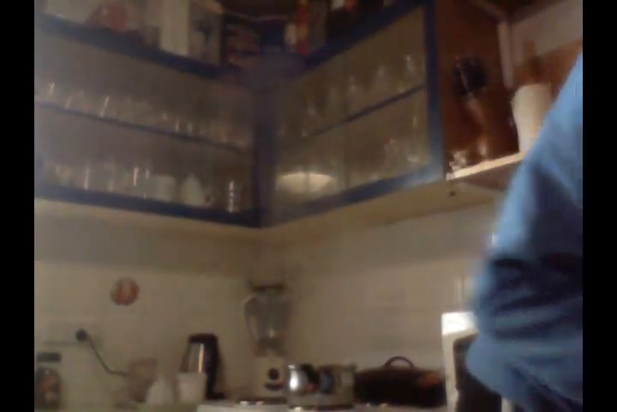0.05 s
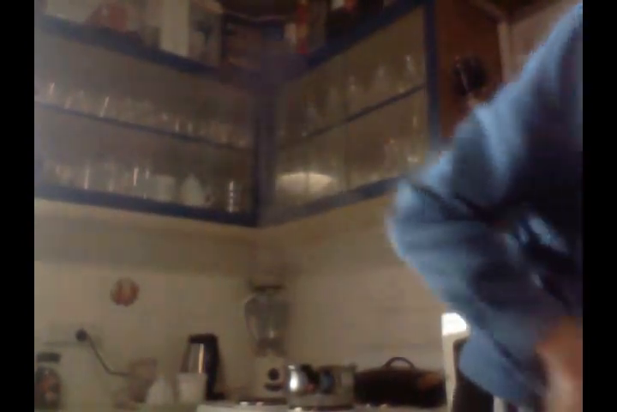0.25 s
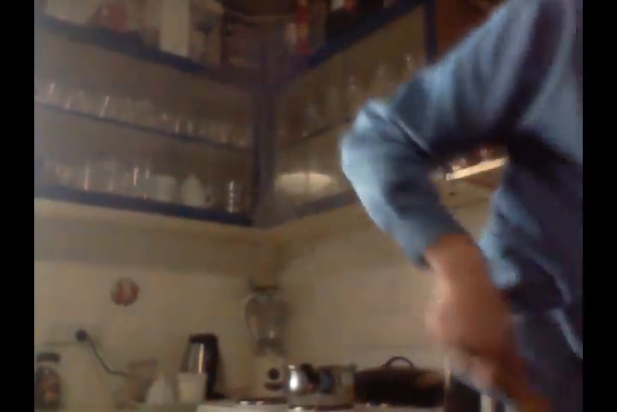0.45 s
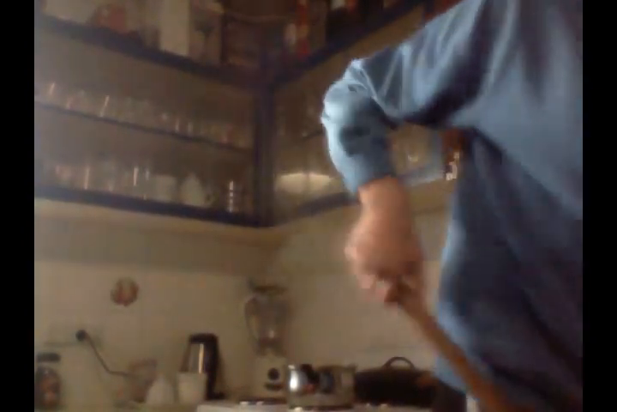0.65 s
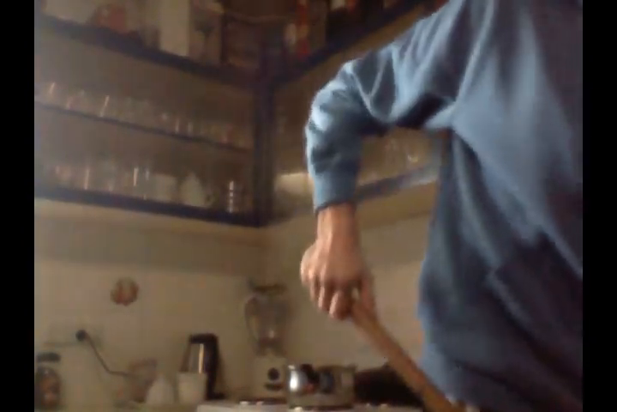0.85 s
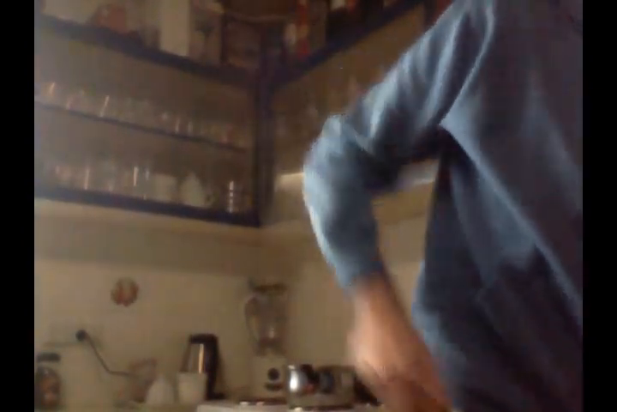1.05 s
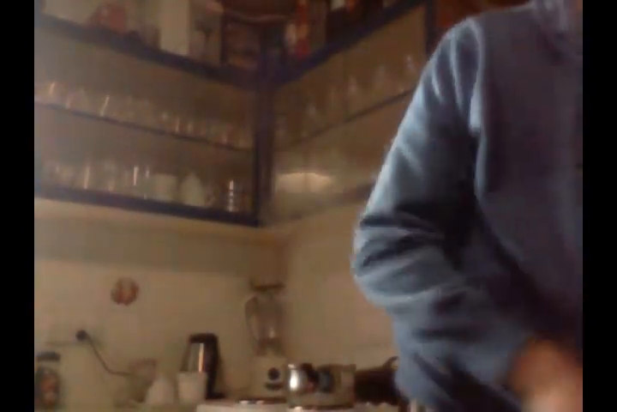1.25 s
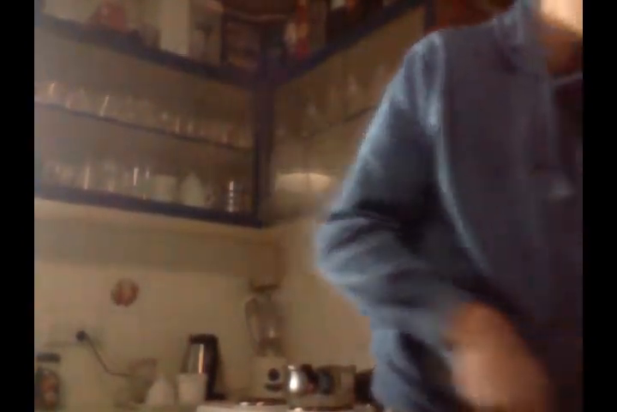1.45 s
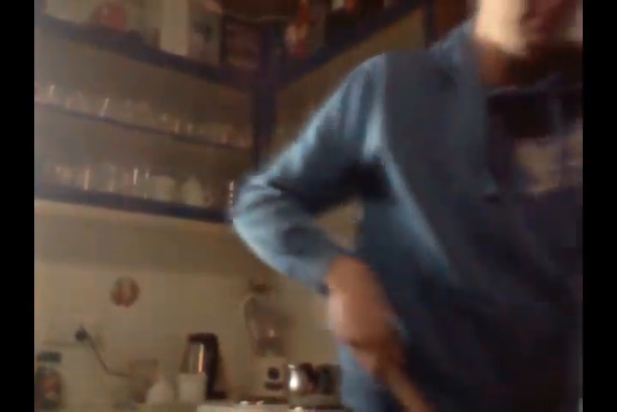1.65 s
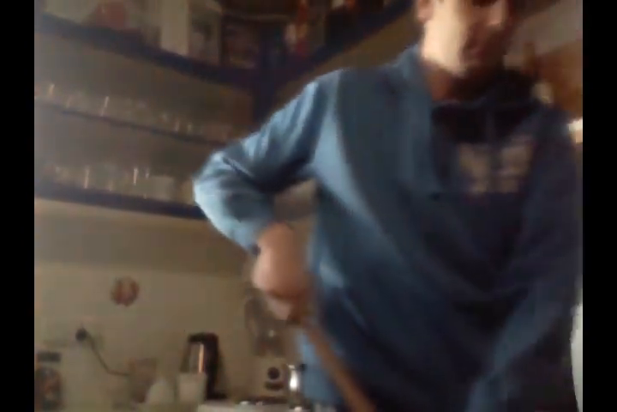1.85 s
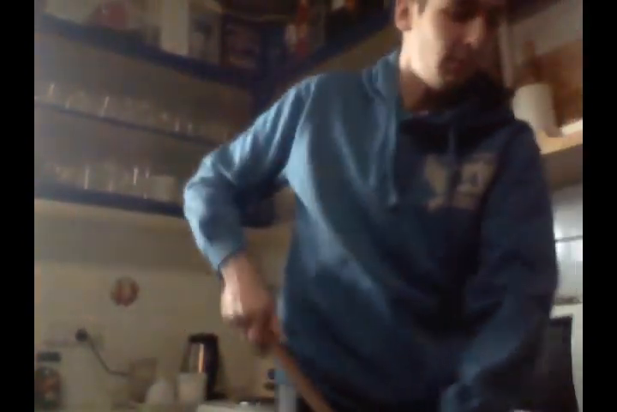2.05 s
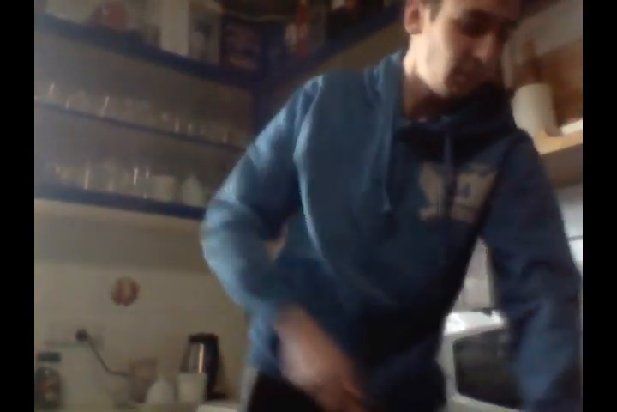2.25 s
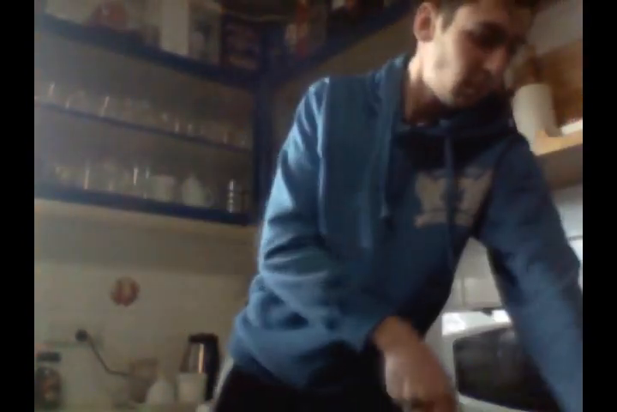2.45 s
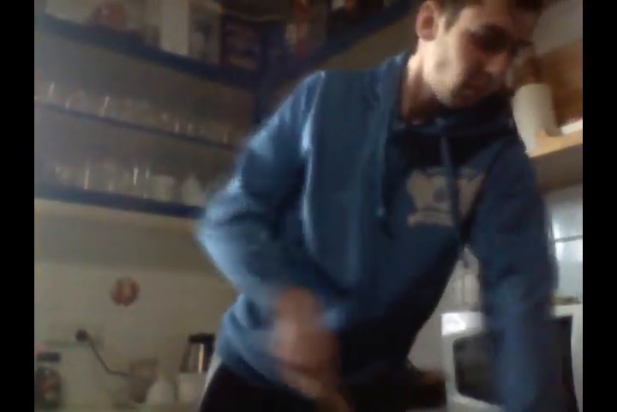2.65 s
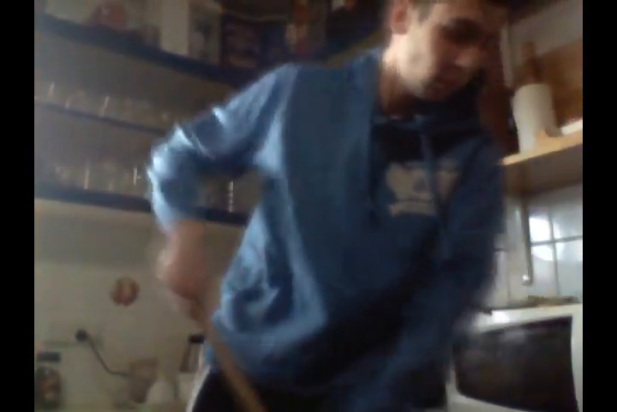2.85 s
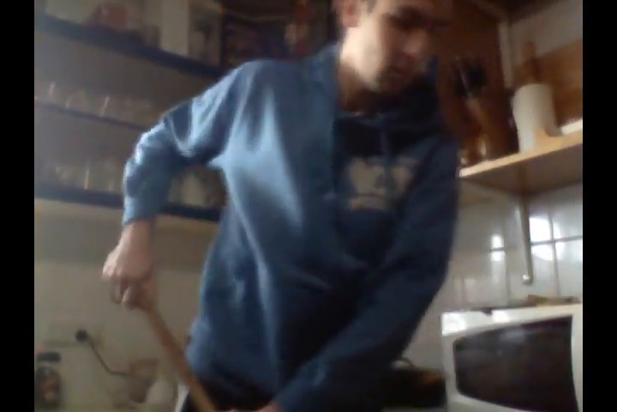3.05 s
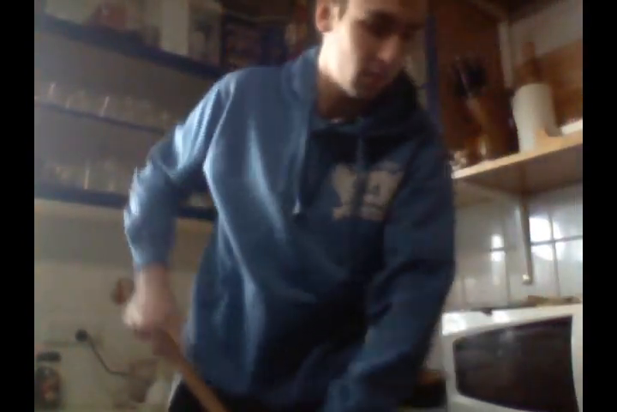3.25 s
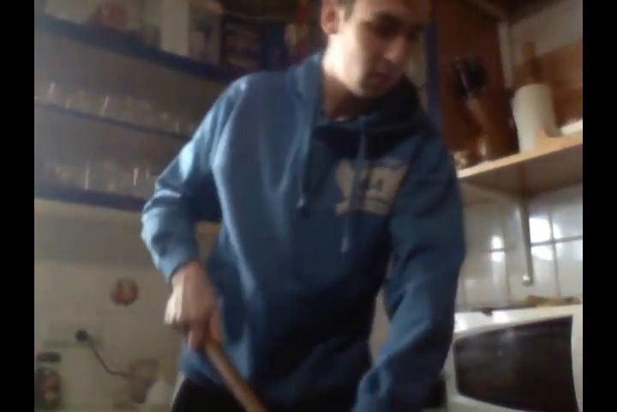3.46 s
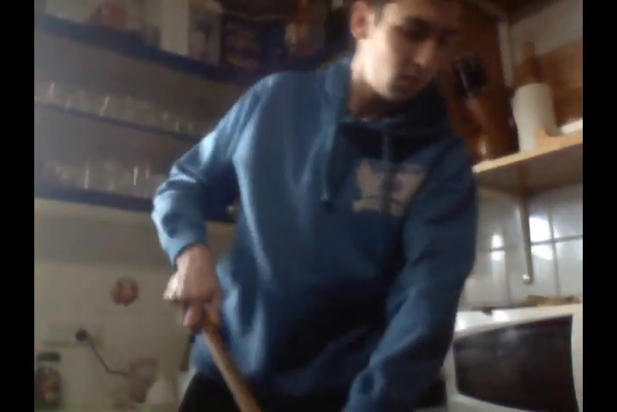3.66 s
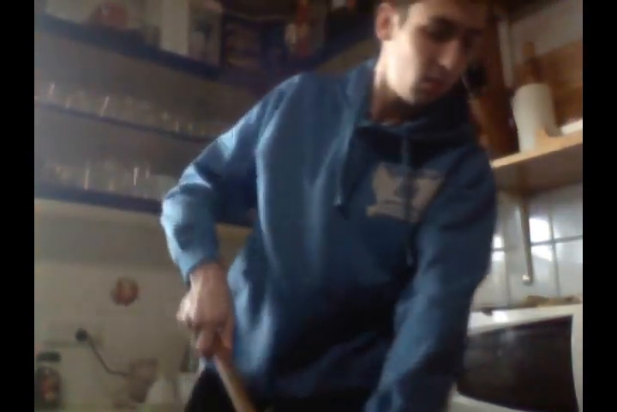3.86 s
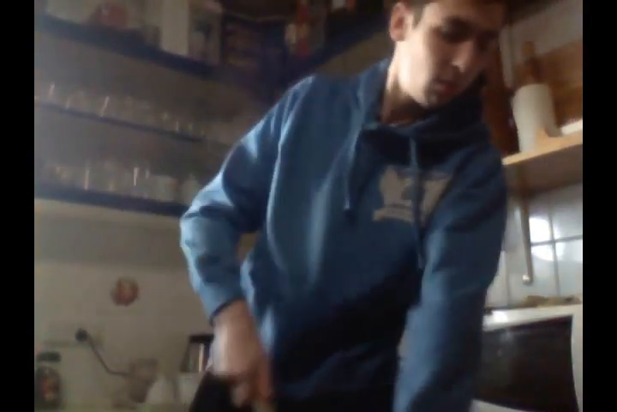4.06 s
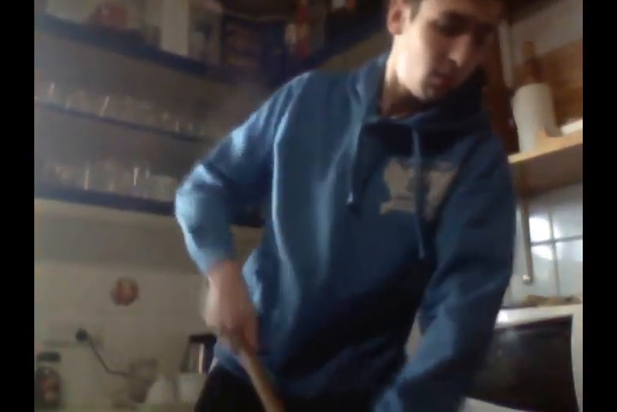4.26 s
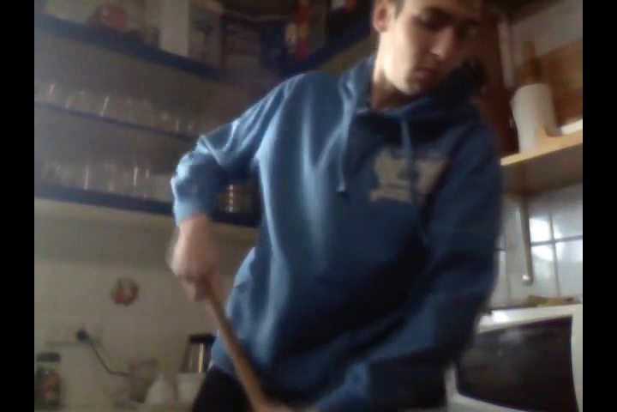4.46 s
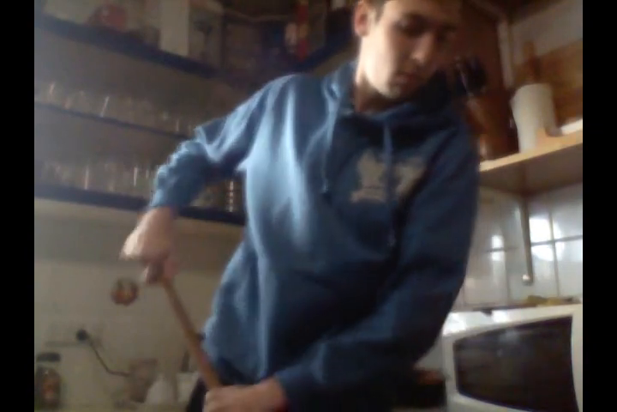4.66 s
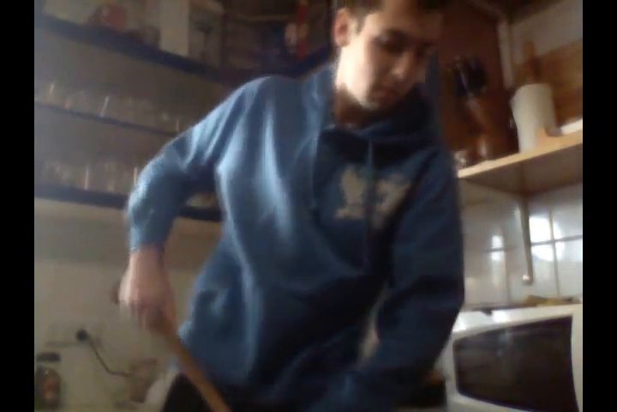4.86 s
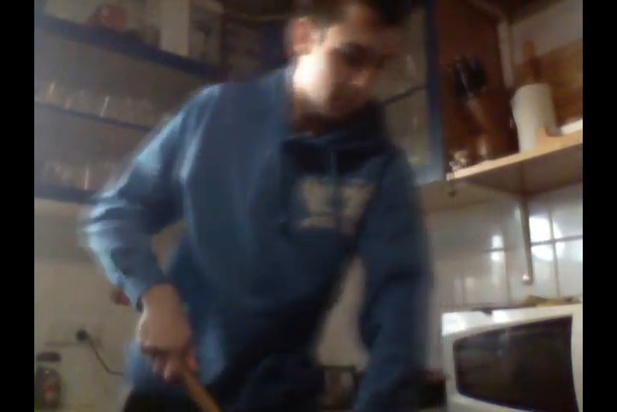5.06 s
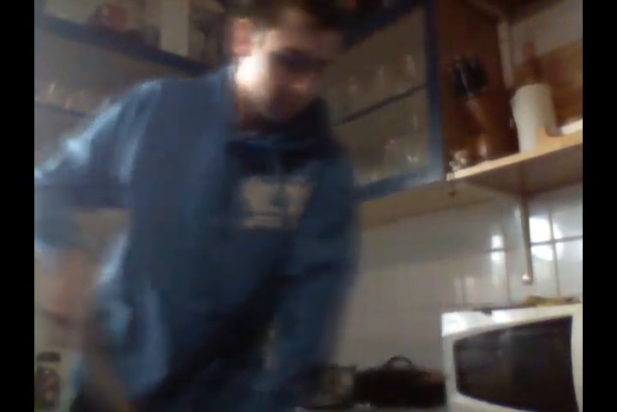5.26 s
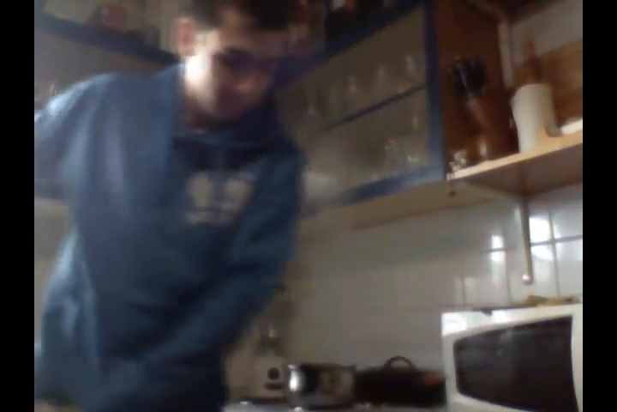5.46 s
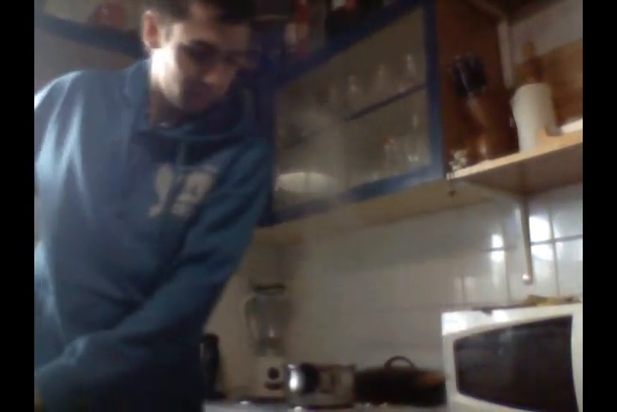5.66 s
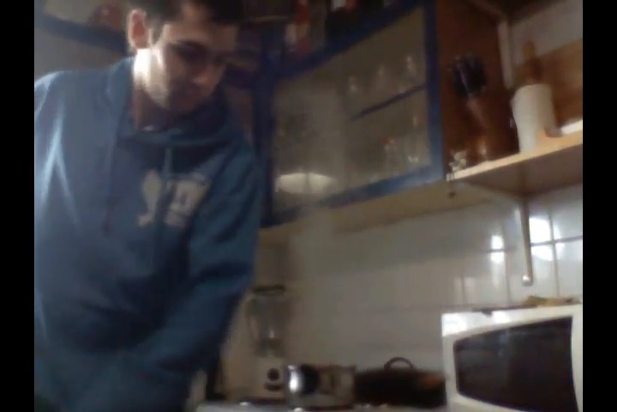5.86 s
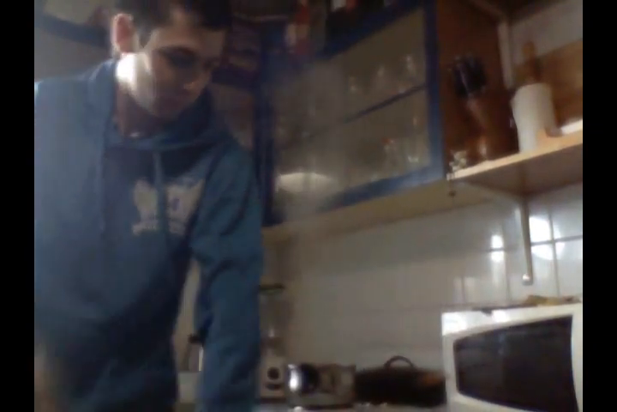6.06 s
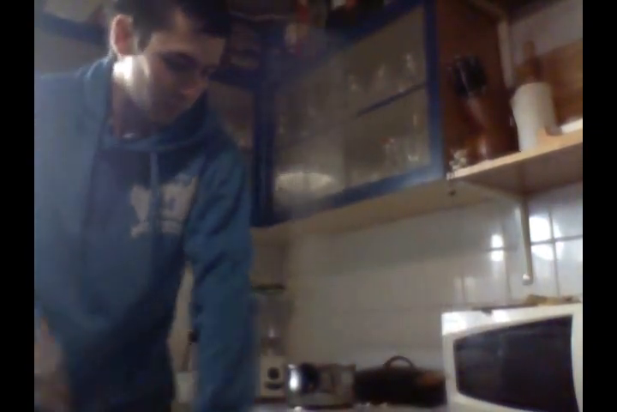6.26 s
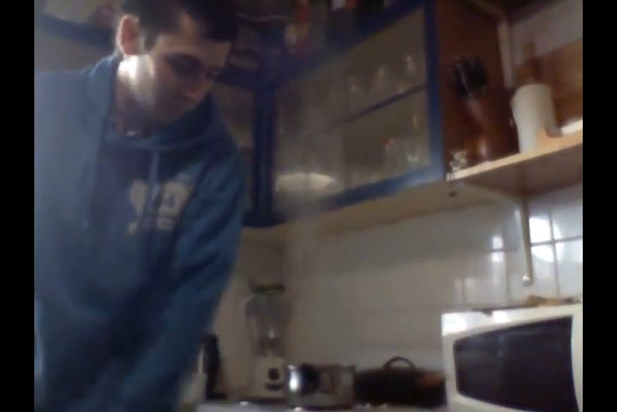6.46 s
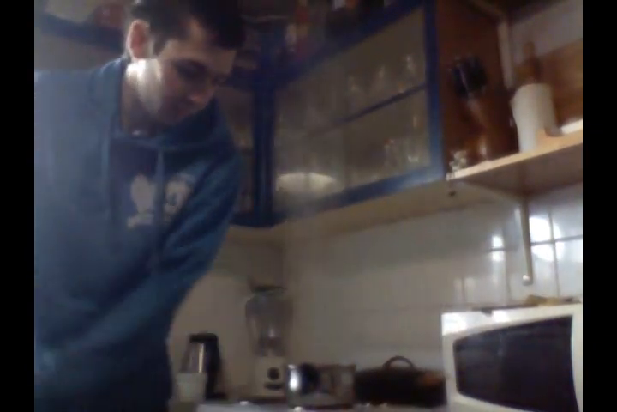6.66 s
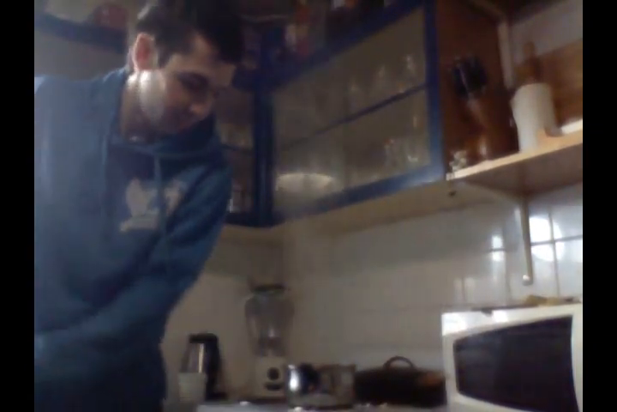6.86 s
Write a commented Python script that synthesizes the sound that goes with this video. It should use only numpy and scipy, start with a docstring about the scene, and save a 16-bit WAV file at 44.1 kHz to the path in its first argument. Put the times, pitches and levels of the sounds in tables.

```python
"""A kitchen floor swept close to a laptop, heard on its one microphone: disk, fan, whistle and hiss run throughout
(sines and noise) while slow air pushes the microphone (low noise). Broom head knocks (struck wood modes in a room)
open the scene, then soft bristle strokes (slips and noise) come from 0.2 s on. Near 1.3, 2.5, 4.0, 5.1 and 6.2 s
heavy steps make the floor boom (sagging low sines, shaking noise) with knocks and strokes; at 2.5, 4.0 and 6.3 s
the laptop case rattles (noise bursts). Peaks past full scale clip, and light knocks come at 6.9 s."""
import sys
import numpy as np
from scipy import signal
from scipy.fft import rfft, irfft, next_fast_len
from scipy.io import wavfile
from scipy.ndimage import map_coordinates

SR = 44100
rng = np.random.default_rng(int(sys.argv[2]) if len(sys.argv) > 2 else 0)


def ratio_of_db(decibels):
    """Turn decibels (scalar or array-like) into linear amplitude factors; 0 dB maps to 1."""
    return 10 ** (np.asarray(decibels, float) / 20)


def unload_wav(signal):
    """Save mono or channel-first audio to the path in sys.argv[1] as 16-bit WAV at rate SR, clipped to [-1, 1]."""
    wavfile.write(
        sys.argv[1],
        SR,
        np.round(np.clip(np.atleast_2d(signal).T, -1, 1) * 32767).astype(np.int16),
    )


N = 304731  # length [samples]

# Fan whine: (multiple of the shaft speed, mean level [dB])
FAN_ORDERS = [(8, -62.5), (9, -56), (11, -63), (12, -54), (13, -76), (16, -51), (17, -68), (20, -83),
              (21, -66.5), (23, -68.5), (28, -69)]
# Fan air and circuit hiss, relative spectrum: (frequency [Hz], level [dB per Hz])
HISS_SPECTRUM = [(30, 6), (60, 12.5), (110, 3), (220, 3.5), (330, -1.5), (800, 0), (1200, -3), (2000, -9.5),
                 (4000, -13.5), (8000, -15.5), (13000, -19)]
# Slow air push on the microphone, relative spectrum: (frequency [Hz], level [dB per Hz])
PUSH_SPECTRUM = [(2, 12), (7, 13), (14, 8), (20, -12), (28, -36), (45, -64)]
# Strength of that air push: (time [s], level [dB])
PUSH_LEVELS = [(0.0, -37), (0.31, -30), (0.63, -26), (1.02, -36), (1.48, -22), (1.79, -21.5), (2.13, -28),
               (2.37, -40.5), (2.58, -31), (2.85, -27.5), (3.02, -33.5), (3.35, -42), (3.62, -24),
               (3.96, -34), (5.02, -35), (5.39, -34), (5.81, -23.5), (6.04, -31), (6.31, -17.5),
               (6.77, -37), (6.91, -20)]
# Trembling floor, relative spectrum: (frequency [Hz], level [dB per Hz])
TREMOR_SPECTRUM = [(28, -4), (45, 18), (58, -2), (72, 10), (110, -47)]
# Footfalls that make the floor boom:
# (start [s], level [dB], pitch before it sags [Hz], rise [s], hold [s])
FOOTFALLS = [(0.06, -33, 51, .02, 0.084), (0.793, -34, 60.8, 0.013, .1), (1.326, -11.5, 53.7, 0.063, 0.047),
             (1.477, -41, 52, 0.017, .04), (1.768, -36, 56.5, 0.012, 0.08),
             (2.466, -6.5, 57.4, 0.029, 0.088), (3.033, -27, 59.4, 0.041, 0.031),
             (3.955, -23.5, 59.7, 0.037, 0.039), (4.024, -4, 61, 0.038, 0.029),
             (4.165, -28.5, 61.5, .02, 0.021), (5.039, -22.5, 58.6, 0.029, 0.025),
             (5.093, -12.5, 59.8, 0.029, 0.06), (5.197, -25.5, 62.3, 0.022, .03),
             (5.712, -36, 60.4, .04, .012), (6.169, -9, 56.5, 0.05, 0.028),
             (6.276, -21.5, 50.3, 0.015, 0.014), (6.333, -38.5, 48, 0.024, 0.075)]
# Higher floor modes, relative spectrum: (frequency [Hz], level [dB per Hz])
SHAKE_SPECTRUM = [(62, -7.5), (78, 14.5), (100, -4.5), (140, -7.5), (250, -17.5), (500, -27.5),
                  (1500, -68.5)]
# Dry rattles of the laptop case: (start [s], level before rise and decay [dB])
CASE_RATTLES = [(2.505, -14), (2.5195, -7), (2.528, -32), (4.0407, -23), (4.0583, -30), (4.0807, -21),
                (4.0857, -20), (6.2577, -24)]
# Laptop case, relative spectrum: (frequency [Hz], level [dB per Hz])
CASE_SPECTRUM = [(200, -11), (800, 15), (2000, 1), (4000, -13), (8000, -21), (12000, -26)]
# Kitchen reverberation: (frequency [Hz], decay by 60 dB [s])
KITCHEN_DECAY = [(150, 0.42), (800, 0.36), (2500, 0.36), (8000, 0.26)]
# Broom head knocks; levels are relative, each part gets a shared offset later:
# (start [s], level [dB], thump level [dB], thump pitch [Hz], clack level [dB], crack level [dB])
HEAD_KNOCKS = [(0.002, -23.5, -8, 320, -11, -16.5), (0.022, -21.5, 3, 195, 1, -4),
               (0.031, -14, 2.5, 312, -3.5, -13.5), (1.336, -27, -8, 190, -11, -4.5),
               (1.344, -22, -9, 230, -4.5, -9.5), (2.470, -21.5, -5, 190, 0.5, -4.5),
               (2.515, -10.5, 1.5, 190, 2, -12.5), (2.527, -3, 2.5, 205, -4.5, -16.5),
               (4.033, -21.5, -16, 183, -13, -17), (4.051, -25, -2, 180, -4, -10),
               (5.054, -33, -8, 183, -6, -12), (5.092, -25.5, -20, 247, -3.5, -5.5),
               (6.172, -19.5, -7, 276, -1, -7.5), (6.188, -19.5, 7, 281, -27, -27),
               (6.853, -28.5, -8, 185, -15, -28), (6.879, -32.5, -1, 250, -12, -21)]
# Modes of the broom head and the board it strikes, before the hand damps them:
# (frequency [Hz], relative strength before scaling [dB], decay by 60 dB [s])
WOOD_MODES = [(144, 0, 0.22), (242, -0.5, 0.27), (312, -10, 0.59), (397, -10, 0.14), (480, -7, 0.32),
              (580, -11, 0.2), (680, -34, 0.16), (808, 10.5, 0.25), (860, 22, 0.077), (957, -15, 0.37),
              (1030, -60, 0.05), (1110, -53, 0.11), (1153, -10, 0.48), (1510, -26, 0.13), (1360, -29, 0.29),
              (1590, -34, 0.97), (1650, -33, 0.33), (1640, -39, 0.16), (2080, 4, 0.35), (2055, -30, 0.28),
              (2360, -30, 3.0), (2880, -40, 0.24)]
# Bristles on the floor, relative spectrum: (frequency [Hz], level [dB per Hz])
BRISTLE_SPECTRUM = [(150, -9), (400, 0.5), (1000, 2), (2000, -2), (3500, -5.5), (5000, -10), (7000, -14.5),
                    (12000, -19)]
# Broom strokes: (start [s], length before lifting [s], pressure before the drag gain [dB], swell [s])
STROKES = [(0.196, 0.53, -52.5, 0.31), (1.298, 0.66, -53.5, 0.32), (2.597, 0.38, -51, 0.22),
           (3.0, 0.44, -61, 0.075), (3.95, 0.662, -51.5, 0.57), (5.077, 0.52, -50.5, 0.44),
           (6.202, 0.53, -50.5, 0.3)]


def unit(x):
    """Scaled to rms 1."""
    return x / np.sqrt(np.mean(x ** 2) + 1e-20)


def along(points, hz):
    """Values of (frequency [Hz], value) points, interpolated on a log frequency axis."""
    f, v = np.transpose(points)
    return np.interp(np.log(hz + 1), np.log(f + 1), v)


def wobble(rate):
    """A smooth random curve with rate knots a second."""
    knots = rng.standard_normal(int(N * rate / SR) + 4)
    return map_coordinates(knots, [np.arange(N) * rate / SR])


def coloured(x, spectrum):
    """x filtered by the given spectrum, rms 1."""
    m = next_fast_len(len(x) + 8192)
    gain = ratio_of_db(along(spectrum, np.fft.rfftfreq(m, 1 / SR)))
    return unit(irfft(rfft(x, m) * gain, m)[:len(x)])


def tone(hz, db):
    """A sine of rms level db following a pitch curve."""
    return np.sqrt(2) * ratio_of_db(db) * np.sin(2 * np.pi * np.cumsum(hz) / SR)


def swell(t, rise):
    """A smooth climb from 0 to 1, starting at t = 0."""
    return np.sin(np.pi / 2 * np.clip(t / rise, 0, 1)) ** 2


def dying(events, t60, rise):
    """Gain from the power sum of (start [s], level [dB]) events that rise and die away."""
    t = np.arange(N) / SR
    return np.sqrt(sum(swell(t - s, rise) * ratio_of_db(db - 60 * np.abs(t - s) / t60) ** 2 for s, db in events))


def lay(out, start_s, sound):
    """Adds a sound into out at its start time."""
    out[round(start_s * SR):][:len(sound)] += sound


def laptop():
    """Steady disk spindle, fan orders that drift together with the shaft, a faint whistle and hiss."""
    shaft_hz = 57.39 * (1 + 0.000855 * wobble(3.125))
    fan = sum(tone(order * shaft_hz, db + 1.1 * wobble(7)) for order, db in FAN_ORDERS)
    disk = tone(np.full(N, 90.3), -41 + 0.91 * wobble(3.87))
    whistle = tone(np.full(N, 7980), -75.5)
    hiss = ratio_of_db(-48.5) * coloured(rng.standard_normal(N), HISS_SPECTRUM)
    return fan + disk + whistle + hiss


def air_push():
    """Slow pressure from the moving body: very low noise of varying strength."""
    time_s, level_db = np.transpose(PUSH_LEVELS)
    push_db = np.interp(np.arange(N) / SR, time_s, level_db)
    return ratio_of_db(push_db) * coloured(rng.standard_normal(N), PUSH_SPECTRUM)


def floor_tremor():
    """The floor trembles faintly at rest, and lingers after each footfall."""
    resting = ratio_of_db(-56)
    after = dying([(s, db - 21) for s, db, *_ in FOOTFALLS], t60=1.33, rise=0.05)
    uneven = ratio_of_db(4.5 * wobble(5.72))
    return (after + resting) * uneven * coloured(rng.standard_normal(N), TREMOR_SPECTRUM)


def booms():
    """The floor swings at its lowest resonance, lower on big swings; its higher modes shake unevenly."""
    fall_t60_s = 0.13  # after the hold
    sag = 0.13  # share by which the pitch drops at a level of 0 dB
    swing, shake = np.zeros(N + SR), np.zeros(N + SR)
    t = np.arange(SR // 2) / SR
    for s, db, hz, rise, hold in FOOTFALLS:
        fall = ratio_of_db(-60 * np.clip(t - rise - hold, 0, None) / fall_t60_s)
        shape = swell(t, rise) * fall
        lay(swing, s, shape * tone(hz * (1 - sag * shape * ratio_of_db(db)), db))
        # the higher modes grow slower than the boom and get a lead as the foot lands
        shake_db = -18 + 0.96 * db + 9 * np.exp(-t / 0.12)
        lay(shake, s, np.sqrt(shape) * ratio_of_db(shake_db))
    return swing[:N] + shake[:N] * coloured(rng.standard_normal(N), SHAKE_SPECTRUM)


def rattles():
    """The laptop case buzzes right at the microphone: short dry noise bursts with no room."""
    out, t = np.zeros(N + SR), np.arange(SR // 20) / SR
    for s, db in CASE_RATTLES:
        shape = ratio_of_db(db - 60 * t / 0.011) * swell(t, 0.0015)
        lay(out, s, shape * coloured(rng.standard_normal(len(t)), CASE_SPECTRUM))
    return out[:N]


def kitchen(x):
    """A fresh room tail of noise in which each frequency dies at its own speed."""
    hz, t, z = signal.stft(rng.standard_normal(SR // 2), SR, nperseg=256)
    near_walls = 1 + 0.5 * ratio_of_db(-60 * t / 0.16)  # the first reflections stand above the diffuse tail
    decay = ratio_of_db(-60 * t / along(KITCHEN_DECAY, hz)[:, None])
    tail = signal.istft(z * decay * near_walls, SR, nperseg=256)[1]
    delayed = np.pad(x, (130, 0))  # samples before the first reflection
    return signal.fftconvolve(delayed, tail / np.linalg.norm(tail))[:len(x)]


def struck(length, blow):
    """A single sharp contact with the spectrum of the blow (minimum phase, so nothing precedes it)."""
    log_gain = np.log(ratio_of_db(along(blow, np.fft.rfftfreq(length, 1 / SR))))
    cepstrum = irfft(log_gain, length)
    cepstrum[1:length // 2] *= 2
    cepstrum[length // 2 + 1:] = 0
    return irfft(np.exp(rfft(cepstrum)), length)


def ring(t, blow):
    """The wood's damped modes, each led by the strength of the blow at its pitch, give or take."""
    hz, db, t60 = np.transpose(WOOD_MODES)[:, :, None]
    db = 0.3 * db + along(blow, hz) + rng.normal(0, 0.32, hz.shape)
    phase = rng.uniform(0, 2 * np.pi, hz.shape)
    return np.sum(ratio_of_db(db - 60 * t / t60) * np.sin(2 * np.pi * hz * t + phase), axis=0)


def knocks():
    """Each blow clacks, chatters for a few ms and rings the wood briefly; the kitchen carries most of it."""
    out, t = np.zeros(N + SR), np.arange(SR // 2) / SR
    for s, db, thump_db, thump_hz, clack_db, crack_db in HEAD_KNOCKS:
        # spectrum of the blow: (frequency [Hz], level [dB])
        blow = [(80, thump_db - 14), (thump_hz, thump_db + 4.0), (450, -4), (640, -5), (820, 0),
                (1200, clack_db - 0.5), (2000, clack_db - 6.0), (2600, crack_db - 4.5),
                (3400, crack_db - 8.0), (5000, crack_db - 18.5), (12000, crack_db - 40)]
        contact = 0.06 * rng.standard_normal(len(t)) * ratio_of_db(-60 * t / 0.02)  # chatter
        contact[0] = 1
        clack = signal.fftconvolve(contact, struck(len(t), blow))[:len(t)]
        hand_damping = ratio_of_db(-60 * t / 0.086)  # the hand damps the handle
        held = hand_damping * ring(t, blow) * (1 - np.exp(-t / 0.00081))
        near = unit(clack) + 0.65 * unit(held)
        heard = near + ratio_of_db(2.0) * kitchen(near)
        cushion = swell(t, 0.0019)  # the bristles soften the start
        lay(out, s, ratio_of_db(db - 20.5) * unit(heard) * cushion)
    return out[:N]


def pressure():
    """Bristle pressure: each stroke swells and lifts off; each landing of the head adds a short scuff."""
    lift_s, rest_db = 0.14, -69.5  # lifting off the floor; faint contact between strokes
    tips_s = 0.047  # the bristle tips touch before the head lands
    t = np.arange(N) / SR
    strokes = 0
    for s, length, db, rise in STROKES:
        lifted = swell(t - s - length, lift_s)
        strokes = strokes + (ratio_of_db(db) * swell(t - s, rise) * (1 - lifted)) ** 2
    # the bristles splay as the head lands
    landings = [(s - tips_s, -47.5 + 0.42 * db) for s, db, *_ in HEAD_KNOCKS]
    scuffs = dying(landings, t60=1, rise=0.037)
    return np.sqrt(strokes + scuffs ** 2 + ratio_of_db(rest_db) ** 2)


def bristles():
    """Thousands of random bristle slips a second, mixed with noise into a soft uneven rustle."""
    drag_db = 3.0 + 1.5 * wobble(9) + 0.8 * wobble(40)  # uneven, slow and fast
    slips = rng.standard_normal(N) * (rng.random(N) < 0.08)
    rustle = coloured(unit(slips) + 1.84 * rng.standard_normal(N), BRISTLE_SPECTRUM)
    return pressure() * ratio_of_db(drag_db) * rustle


def scene():
    """Everything at one microphone."""
    broom_and_steps = booms() + knocks() + rattles() + bristles()
    return (broom_and_steps + laptop() + air_push() + floor_tremor())[None]


def roll_off(x):
    """The treble ends steeply here."""
    return signal.sosfilt(signal.butter(12, 13350, fs=SR, output="sos"), x)


def record(dry):
    """The microphone input clips at full scale and keeps nothing above its band limit."""
    top_hz = 12780
    spectrum = rfft(np.clip(dry, -1, 1))
    mix = irfft(spectrum * (np.fft.rfftfreq(N, 1 / SR) < top_hz), N)
    return roll_off(mix)


dry = scene()
out = record(dry)
unload_wav(out)
```